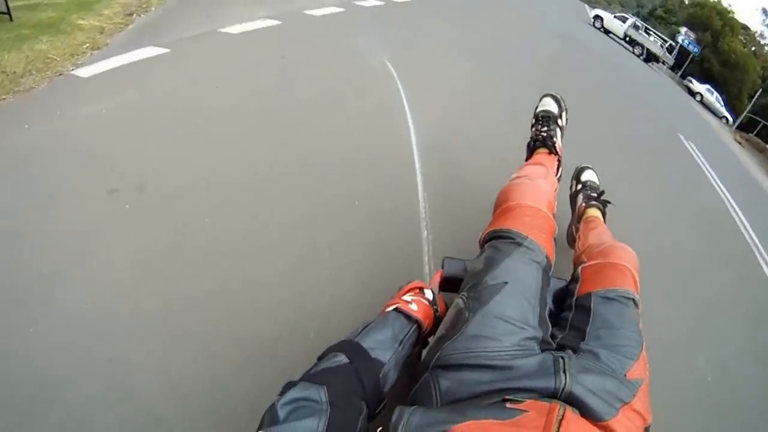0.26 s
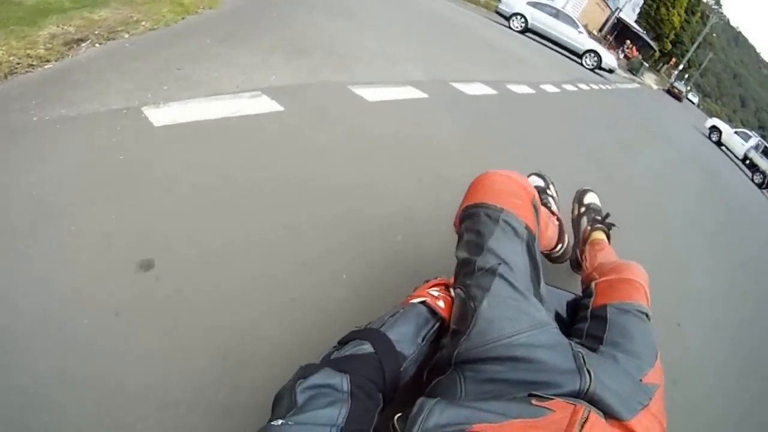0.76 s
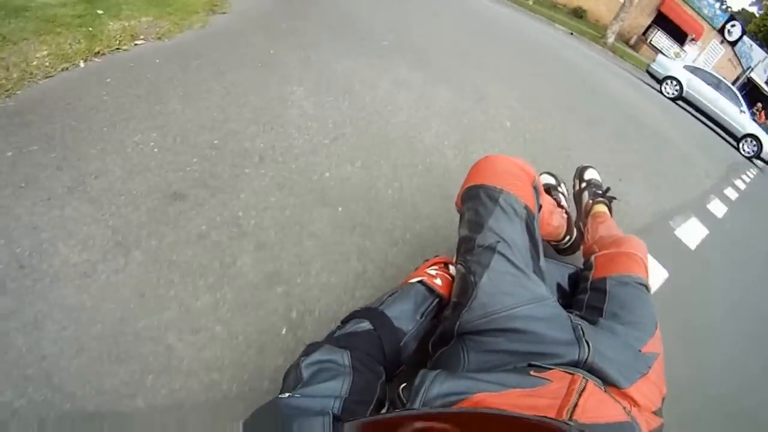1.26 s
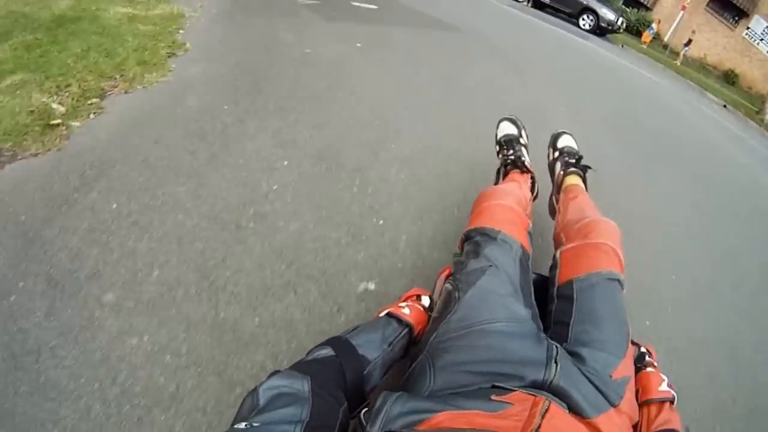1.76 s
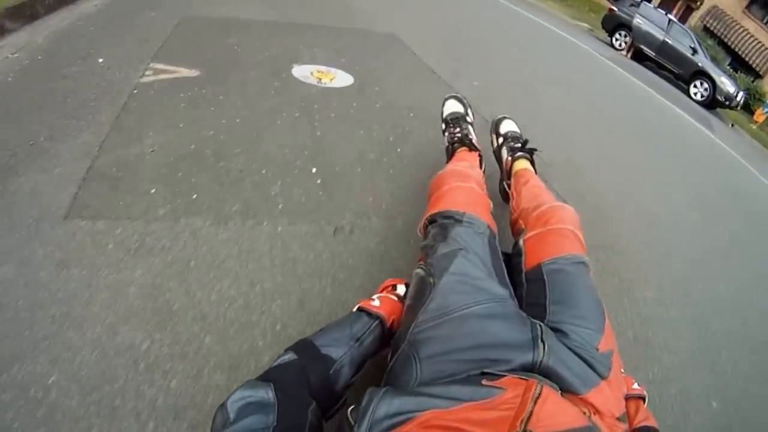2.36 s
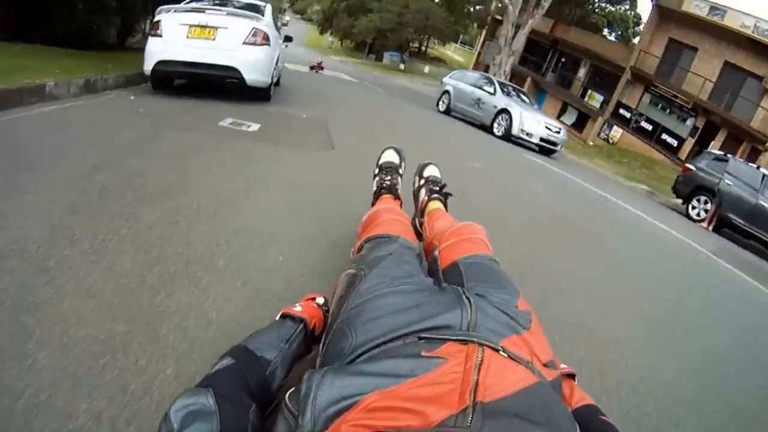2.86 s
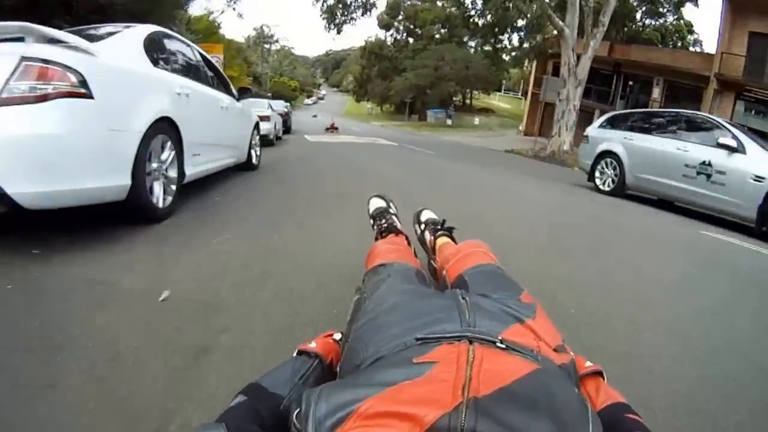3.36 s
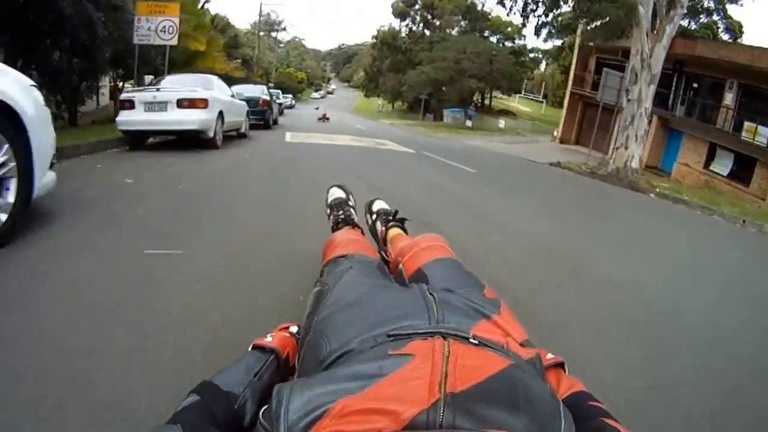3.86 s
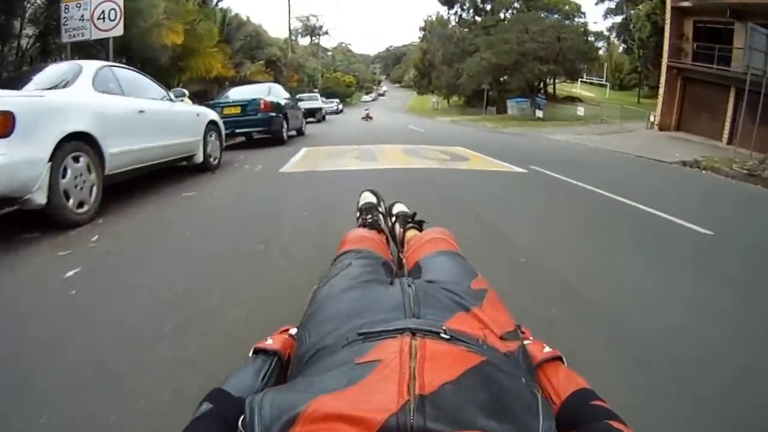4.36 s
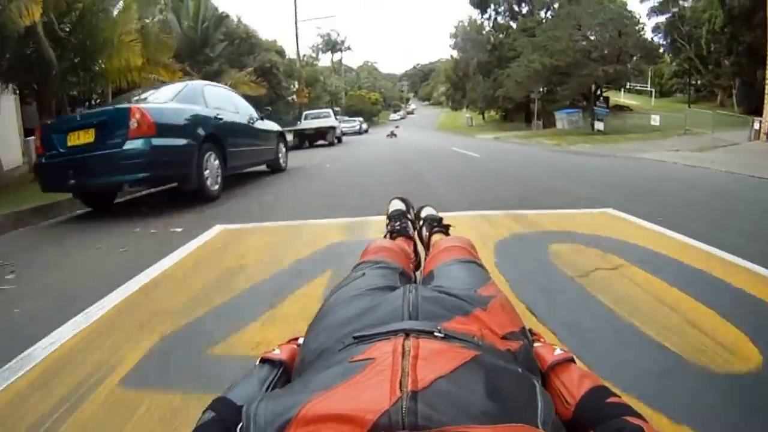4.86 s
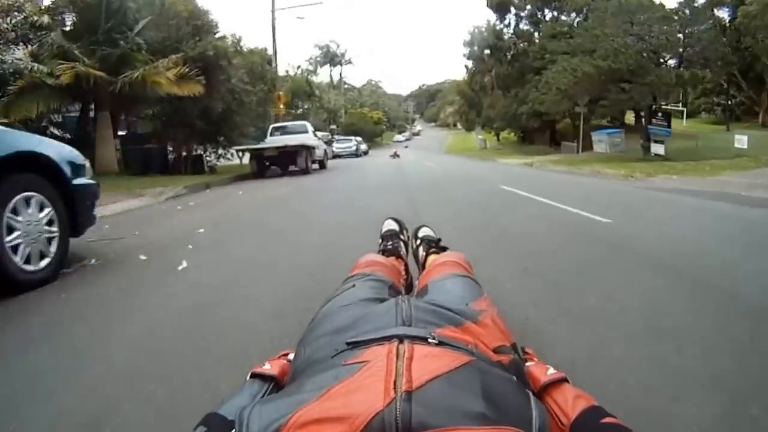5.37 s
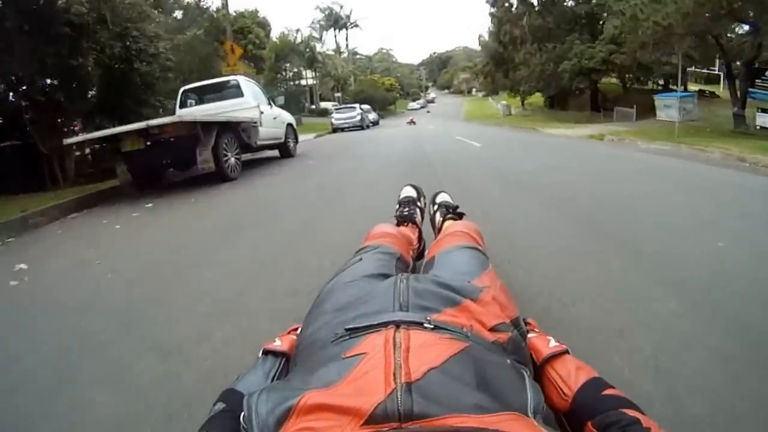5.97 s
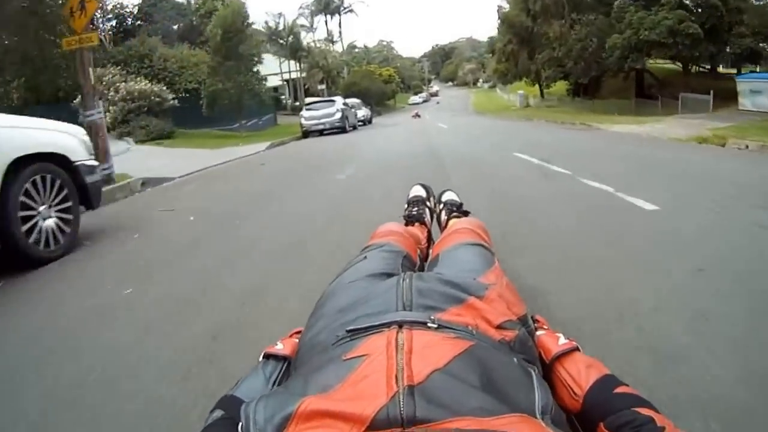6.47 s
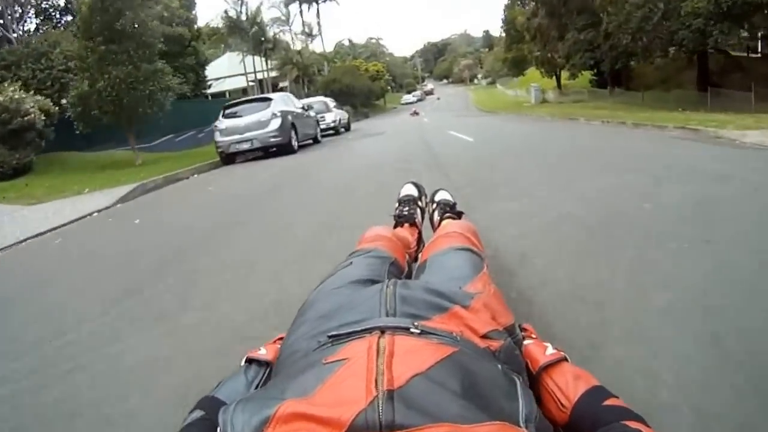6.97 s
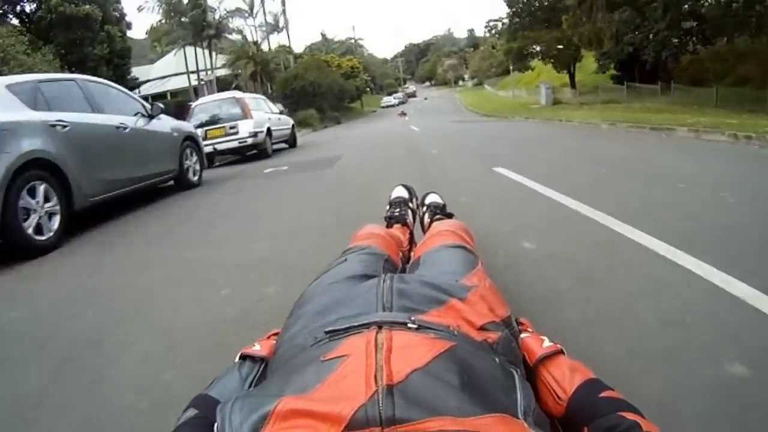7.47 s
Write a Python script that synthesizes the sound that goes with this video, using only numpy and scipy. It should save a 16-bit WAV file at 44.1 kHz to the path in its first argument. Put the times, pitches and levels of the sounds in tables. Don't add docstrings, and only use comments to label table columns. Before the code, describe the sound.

Outdoors on a road, heard in mono through a closed case: quiet rolling and airflow at first, a faint brief skid note, then a dull crack and a burst of grit and stone ticks. Low jolts follow across a road patch. The second half is faster and louder, with deep short thumps, a rising wheel hum, rough wind roar and a slightly harsh, coarse treble.

```python
import sys
import numpy as np
from scipy import signal
from scipy.fft import rfft, irfft, next_fast_len
from scipy.io import wavfile
from scipy.ndimage import uniform_filter1d, map_coordinates

SR = 44100
rng = np.random.default_rng(int(sys.argv[2]) if len(sys.argv) > 2 else 0)


def master_out(mix):
    frames = np.transpose(np.atleast_2d(mix))
    ceiling = np.clip(frames, -1, 1)
    pcm = np.round(ceiling * 32767).astype(np.int16)
    wavfile.write(sys.argv[1], SR, pcm)


def amplitude_ratio(level_db):
    exponent = np.asarray(level_db, float) / 20
    return 10 ** exponent


N = 340893

# [t/s, peak level/dB, ring f/Hz, time to fall 60 dB/s]
BUMPS = [
    (0.929, -30, 86.5, 0.19),
    (1.819, -29, 81.6, 0.11),
    (3.739, -13, 82.5, 0.14),
    (4.012, -12, 85, 0.14),
    (4.201, -12.5, 79, 0.15),
    (4.74, -14, 79.5, 0.12),
    (4.896, -9, 79.1, 0.078),
    (4.967, -14.5, 84, 0.17),
    (5.614, -14.5, 82, 0.18),
    (6.194, -11, 85.1, 0.19),
]
# [t/s, peak level/dB, ring f/Hz, time to fall 60 dB/s]
DIPS = [
    (1.555, -30, 74, 0.11),
    (2.986, -15, 72, 0.084),
    (3.93, -13, 76, 0.17),
    (5.104, -11.5, 74.3, 0.12),
]
# [t/s, peak level/dB, ring f/Hz, time to fall 60 dB/s]
SEAM_RISES = [
    (2.486, -23, 44.77, 0.053),
    (2.546, -18.5, 43.6, 0.046),
    (2.713, -21, 44.8, 0.078),
    (2.821, -22, 45, 0.06),
    (2.939, -19, 44.8, 0.048),
]
# [t/s, peak level/dB, ring f/Hz, time to fall 60 dB/s]
SEAM_DROPS = [
    (2.519, -31, 45, 0.03),
    (2.687, -21, 46.7, 0.06),
    (2.771, -20, 44.5, 0.075),
    (2.906, -18.5, 44.66, 0.06),
]
# [t/s, peak level/dB]
BENDS = [
    (0.93, -43.5),
    (2.49, -39),
    (2.985, -32),
    (3.09, -32),
    (3.49, -38),
    (3.739, -40),
    (3.945, -29),
    (4.896, -37),
    (6.194, -32),
]
# [t/s, peak level/dB, ring f/Hz, time to fall 60 dB/s]
KNOCK = [
    (2.631, -37, 593, 0.1),
]
# [t/s, half length/s, level/dB, f/Hz]
RIPPLES = [(.17, 0.096, -49, 85), (.47, 0.075, -48, 63.5), (1.179, 0.058, -44, 86),
           (1.431, 0.049, -41, 70.2), (1.65, 0.18, -35, 60.1), (2.109, 0.33, -43, 78),
           (2.525, 0.032, -28.5, 85.8), (2.666, .05, -39, 62.5), (3.01, 0.034, -17, 73.34),
           (3.15, .05, -27, 81.6), (3.319, .04, -29, 68), (3.53, 0.036, -38, 64.8),
           (3.744, .07, -26.5, 77.1), (4.018, 0.064, -22, 86.9), (4.288, 0.13, -22, 80),
           (4.492, 0.11, -25, 77), (4.717, 0.045, -27, 80.6), (4.91, 0.033, -18, 76.8),
           (5.129, 0.046, -17, 87.1), (5.29, 0.09, -29, 82), (5.438, 0.042, -28, 67),
           (5.6, 0.084, -23.5, 85.8), (5.757, 0.055, -27.5, 82.26), (6.0, 0.22, -26.5, 81.8),
           (6.307, .06, -23, 83.23), (6.475, 0.097, -22, 79), (6.725, .11, -24, 84),
           (6.972, 0.076, -48, 78), (7.25, .08, -29.5, 90), (7.609, 0.081, -29.5, 85)]
# [f/Hz, width/Hz, level/dB]
DECK_MODES = [(91, 12.8, -1), (67, 24, -7), (183.5, 46, -29)]

# [t/s, half length/s, level/dB]
GUSTS = [(.4, 0.11, -42), (1.531, 0.17, -36), (2.102, 0.17, -41), (2.52, .07, -23), (2.956, 0.25, -24.5),
         (3.15, 0.083, -41), (3.454, 0.16, -32), (3.661, 0.075, -23.5), (3.85, .12, -18.5),
         (4.226, 0.049, -21), (4.43, .04, -24.5), (4.75, .1, -23), (4.936, 0.09, -16), (5.15, 0.069, -19.5),
         (5.557, 0.083, -23.5), (5.399, 0.098, -30), (5.92, 0.14, -21), (6.15, .07, -27),
         (6.559, 0.041, -23), (6.75, .15, -32), (7.056, .12, -29.5), (7.627, .07, -23)]
# [t/s, strength level/dB]
AIR = [(0.0, -52), (0.23, -50), (0.26, -52.5), (1.2, -54.5), (1.29, -61), (1.33, -54), (1.66, -46),
       (1.68, -52.5), (2.07, -50), (2.2, -54.5), (2.5, -45.5), (2.69, -50.5), (5.51, -37), (5.53, -34.5),
       (5.75, -38.5), (5.94, -35), (7.3, -32.5), (7.73, -30)]
# [f/Hz, level per Hz/dB]
BUFFET_COLOUR = [(4.7, -41), (8.0, -15), (22, 10.5), (53, -2), (86, -3.5), (130, -19.5), (200, -16),
                 (260, -65), (440, -120)]
# [f/Hz, level per Hz/dB]
ROAR_COLOUR = [(260, -4.5), (450, -20.5), (525, -5), (619, -13.5), (785, -12.5), (1030, 1), (1390, -2.5),
               (1530, -1.5), (1850, -11.5), (2400, -49), (4070, -120)]
# [f/Hz, level per Hz/dB]
RUSH_COLOUR = [(1090, -29), (1850, -13.5), (2080, -2), (2230, 0), (2540, -9), (2870, -10.5), (3060, -16),
               (3510, -16), (4290, -26), (4830, -22.5), (6000, -37.5), (7800, -64), (13200, -120)]

# [t/s, drumming level/dB]
ROAD = [(0.0, -50), (1.18, -48), (1.31, -39), (2.22, -43.5), (2.3, -39.5), (2.63, -46), (2.82, -37.5),
        (2.86, -39), (4.24, -39), (4.28, -41), (4.37, -40), (4.72, -42), (4.76, -39), (5.55, -42.5),
        (5.6, -39.5), (7.45, -42.5), (7.6, -41), (7.73, -42)]
# [f/Hz, level per Hz/dB]
RUMBLE_COLOUR = [(71, -51), (120, -8), (199, -15), (268, 0), (431, -3.5), (497, -8.5), (611, -8.5),
                 (683, -13.5), (800, -13), (1040, -28), (1760, -120)]
# [f/Hz, level per Hz/dB]
GRIT_COLOUR = [(1760, -0.5), (3000, 1), (3230, 7.5), (3430, -13.5), (3650, -1), (3930, 0.5), (5360, 1),
               (6000, -11), (7800, -44), (13200, -120)]
# [t/s, half length/s, level/dB]
DRIFTS = [
    (1.596, .1, -54),
    (1.92, 0.22, -52.5),
    (2.554, .1, -52),
    (3.103, 0.17, -51),
    (4.497, 0.24, -51.5),
    (5.0, 0.22, -49),
]
# [t/s, bearing rate f/Hz]
SPIN = [(0, 63.01), (.8, 63.99), (1.3, 55.8), (2.1, 63.4), (2.8, 75.07), (3.5, 86.3), (4.1, 98.7),
        (4.9, 109.8), (5.5, 121), (6.3, 130.2), (7.73, 144.6)]
# [multiple of the rate, level/dB]
BEARING = [(2.16, -0.9), (3.01, 0.1), (4.01, -0.8), (5.4, -3.5)]
# [f/Hz, width/Hz, level/dB]
CASE_MODES = [(607, 49, -3.5), (854, 66, 0), (1022, 58, 5), (1580, 87, -13), (2478, 140, 4),
              (2830, 200, -7.5), (3000, 73, -40), (3630, 27, -11)]

# [t/s, peak level/dB]
SLAPS = [
    (1.435, -27),
    (2.473, -29),
    (2.978, -24.5),
]
# [t/s, peak level/dB, low part level/dB]
STONES = [(1.3397, -43.5, 20), (1.5762, -36, 23), (1.5844, -47, 11), (1.6087, -46, 5), (1.654, -28.5, 4),
          (1.759, -42, 15), (1.8058, -39, -2), (1.8198, -33, 0), (1.8524, -35.5, 15.5), (1.8794, -35, 11),
          (1.9764, -39, -5), (1.9874, -35, 8), (2.0494, -34, 13.5), (2.1061, -42, -1), (2.1645, -38, 3),
          (2.2732, -39, -6), (2.4747, -37.5, 20.5), (2.527, -32, 9), (2.5794, -38, 0), (2.6358, -30.5, 11),
          (2.9751, -34, 14), (3.047, -34, -2), (3.1346, -25.5, 5), (3.1804, -32, 4), (3.255, -35, -2),
          (3.4153, -35, 9), (4.0894, -33, -1), (4.8599, -25, 6), (5.1689, -24, 4), (5.4989, -32, 5)]
# [t/s, f/Hz, level/dB]
SQUEAL = [
    (.98, 860, -62),
    (1.06, 875, -55.5),
    (1.14, 925, -56),
    (1.19, 965, -55.5),
    (1.26, 895, -55.5),
    (1.33, 850, -58),
]

# (level/dB, dB gained per dB of air, per dB of road, extra level on the loose chippings/dB)
BUFFET_LAW, ROAR_LAW, RUSH_LAW = (-38, 1.04, .3, -4), (-46, 0.8139, 0.63, -1.2), (-41, 1.05, 0.14, -3)
RUMBLE_LAW, AXLE_LAW = (-43, 0.11, 0.56, 4.5), (-44.5, 0.1, 1.54, 2)
CHATTER_LAW, GRIT_LAW, HUM_LAW = (-49, 0.41, 0.28, 5.5), (-51.5, 0.4, 0.54, 0.5), (-40.5, 0.49, 1.3, -14)
AIR_REF_DB, ROAD_REF_DB = -42, -42
LOOSE_S, LOOSE_EDGE_S = (1.365, 2.57), (0.036, .3)
AXLE_MODE_HZ, AXLE_WIDTH_HZ = 322, 54
HOLD_HZ, TOP_HZ = 12000, 15330


def deck():
    hz, = curves([(s, hz) for s, _, _, hz in RIPPLES])
    shake = noise(modes(DECK_MODES), patchy_db=-0.5, flutter_db=0.5, rate=7.9)
    texture = hum(hz, wander_hz=6.893, flutter_db=1.5, rate=25) + 0.57 * shake
    boom = swelling(driven(HUM_LAW), RIPPLES) * texture
    boom = boom * calm(BUMPS + DIPS, depth=1.0, width=0.029)
    boom = boom + struck(BUMPS, rise=0.0177) - struck(DIPS, rise=0.0178)
    boom = boom + struck(SEAM_RISES, rise=0.01645) - struck(SEAM_DROPS, rise=0.0157)
    overtone = struck([(s, db, 188, .12) for s, db in BENDS], rise=0.0173)
    lopsided = 0.26 * filtered(boom ** 2, lambda f: f > 45)
    return boom + overtone + lopsided + struck(KNOCK, rise=0.0085)


def wind():
    buffet = swelling(driven(BUFFET_LAW), GUSTS)
    sheltered = calm(SEAM_RISES + SEAM_DROPS + BUMPS + DIPS, depth=0.19, width=0.074)
    lumps = sheltered * buffet * noise(along(BUFFET_COLOUR), patchy_db=-1.0, flutter_db=-3.0, rate=4)
    roar = noise(along(ROAR_COLOUR), patchy_db=0.5, flutter_db=1.0, rate=30)
    rush = noise(along(RUSH_COLOUR), patchy_db=0.86, flutter_db=1.17, rate=45)
    return lumps + amplitude_ratio(driven(ROAR_LAW) + 1.5) * roar + amplitude_ratio(driven(RUSH_LAW)) * rush


def wheels():
    rumble = noise(along(RUMBLE_COLOUR), patchy_db=0.65, flutter_db=1.8, rate=30)
    rumble = amplitude_ratio(driven(RUMBLE_LAW) - 3.0) * rumble
    spin_hz, = curves(SPIN)
    axle = np.zeros(N)
    for multiple, db in BEARING:
        hz = multiple * spin_hz
        lift = amplitude_ratio(db) / np.hypot(1, ((hz - AXLE_MODE_HZ) / AXLE_WIDTH_HZ) ** 2)
        axle += lift * hum(hz, wander_hz=24.01, flutter_db=4.0, rate=65)
    hits = rng.random((2, N)) < 4000 / SR
    impacts = hits * rng.standard_normal((2, N)) * amplitude_ratio(1.7 * wobble(60) + 1.0 * wobble(25))
    chatter = amplitude_ratio(driven(CHATTER_LAW)) * unit(filtered(impacts[0], modes(CASE_MODES)))
    grit = unit(filtered(impacts[1], along(GRIT_COLOUR)))
    grit = swelling(driven(GRIT_LAW), DRIFTS) * amplitude_ratio(-5.0) * grit
    return rumble + amplitude_ratio(driven(AXLE_LAW)) * axle + chatter + grit


def slaps():
    t = np.arange(SR // 12) / SR
    out = np.zeros(N + len(t))
    for s, db in SLAPS:
        fade = amplitude_ratio(db + 11.0 - 60 * t / 0.043) * (1 - np.exp(-t / .004))
        out[round(s * SR):][:len(t)] += fade * rng.standard_normal(len(t))
    tyre = modes([(500, 1400, 0)])
    return filtered(out[:N], lambda f: tyre(f) ** 2 / (1 + (f / 2500) ** 4))


def stones():
    t = np.arange(SR // 12) / SR
    bright, dull = np.zeros((2, N + len(t)))
    bright_fade = amplitude_ratio(-60 * t / 0.019) * (1 - np.exp(-t / 0.0014))
    for s, db, low_db in STONES:
        crackle, answer = amplitude_ratio(db) * rng.standard_normal((2, len(t)))
        dull_fade = amplitude_ratio(low_db + 0.5 - 60 * t / 0.053) * (1 - np.exp(-t / 0.003))
        bright[round(s * SR):][:len(t)] += bright_fade * crackle
        dull[round(s * SR):][:len(t)] += dull_fade * answer
    top = modes([(3500, 900, 2.6), (4660, 520, 4.7), (5100, 390, 3.9)])
    return filtered(bright[:N], top) + filtered(dull[:N], modes(CASE_MODES))


def squeal():
    hz, db = curves(SQUEAL)
    on = np.interp(np.arange(N) / SR, [.97, 1.02, 1.3, 1.35], [0, 1, 1, 0])
    return on * amplitude_ratio(db) * hum(hz, wander_hz=13, flutter_db=3, rate=60)


def hum(hz, wander_hz, flutter_db, rate):
    phase = 2 * np.pi * np.cumsum(hz + wander_hz * wobble(rate)) / SR
    return unit(amplitude_ratio(flutter_db * wobble(rate)) * np.sin(phase))


def struck(rows, rise):
    t = np.arange(SR // 2) / SR
    out = np.zeros(N + len(t))
    for s, db, hz, t60 in rows:
        swell = np.sin(np.pi / 2 * np.minimum(t / rise, 1)) ** 2
        fade = amplitude_ratio(db - 60 * np.maximum(t - rise, 0) / t60)
        out[round(s * SR):][:len(t)] += swell * fade * np.cos(2 * np.pi * hz * (t - rise))
    return out[:N]


def calm(rows, depth, width):
    t = np.arange(N) / SR
    return np.prod([1 - depth * np.exp(-((t - s - .02) / width) ** 2) for s, *_ in rows], axis=0)


def driven(law):
    level_db, per_air, per_road, loose_db = law
    (air_db,), (road_db,), t = curves(AIR), curves(ROAD), np.arange(N) / SR
    entered = np.tanh((t - LOOSE_S[0]) / LOOSE_EDGE_S[0])
    left = np.tanh((t - LOOSE_S[1]) / LOOSE_EDGE_S[1])
    followed = per_air * (air_db - AIR_REF_DB) + per_road * (road_db - ROAD_REF_DB)
    return level_db + followed + loose_db * (entered - left) / 2


def swelling(steady_db, rows):
    t = np.arange(N) / SR
    swells = sum(amplitude_ratio(2 * db) * np.exp(-2 * ((t - s) / half) ** 2) for s, half, db, *_ in rows)
    return np.sqrt(amplitude_ratio(2 * steady_db) + swells)


def noise(response, patchy_db, flutter_db, rate):
    z = signal.stft(rng.standard_normal(N), nperseg=512)[2]
    field = uniform_filter1d(uniform_filter1d(rng.standard_normal(z.shape), 5, 0), 5, 1)
    patchy = signal.istft(z * amplitude_ratio(patchy_db * unit(field)), nperseg=512)[1][:N]
    return unit(filtered(patchy * amplitude_ratio(flutter_db * wobble(rate)), response))


def filtered(x, response):
    m = next_fast_len(N + SR // 2)
    return irfft(rfft(x, m) * response(np.fft.rfftfreq(m, 1 / SR)), m)[..., :N]


def along(points):
    f, v = np.transpose(points)
    return lambda hz: amplitude_ratio(np.interp(np.log(hz + 1), np.log(f + 1), v))


def modes(rows):
    def response(f):
        total = 0
        for k, (centre, width, db) in enumerate(rows):
            damping = 1j * f * width
            total = total + (-1) ** k * amplitude_ratio(db) * damping / (centre * centre - f * f + damping)
        return total
    return response


def curves(rows):
    s, *cols = np.transpose(rows)
    return [np.interp(np.arange(N) / SR, s, c) for c in cols]


def wobble(rate):
    return map_coordinates(rng.standard_normal(int(N * rate / SR) + 4), [np.arange(N) * rate / SR])


def unit(x):
    return x / np.sqrt(np.mean(x ** 2) + 1e-20)


def scene():
    return np.tile(deck() + wind() + wheels() + slaps() + stones() + squeal(), (2, 1))


def top_cut(x):
    return signal.sosfilt(signal.butter(12, 16090, fs=SR, output="sos"), x)


def record(dry):
    taken = filtered(dry, lambda hz: (hz < HOLD_HZ / 2) / np.sinc(np.minimum(hz / HOLD_HZ, .5)))
    mirrored = taken * (1 + 2 * np.cos(2 * np.pi * HOLD_HZ * np.arange(N) / SR))
    held = filtered(mirrored, lambda hz: np.sinc(hz / HOLD_HZ) * (hz < TOP_HZ))
    return top_cut(held)


dry = scene()
out = record(dry)
master_out(out)
```